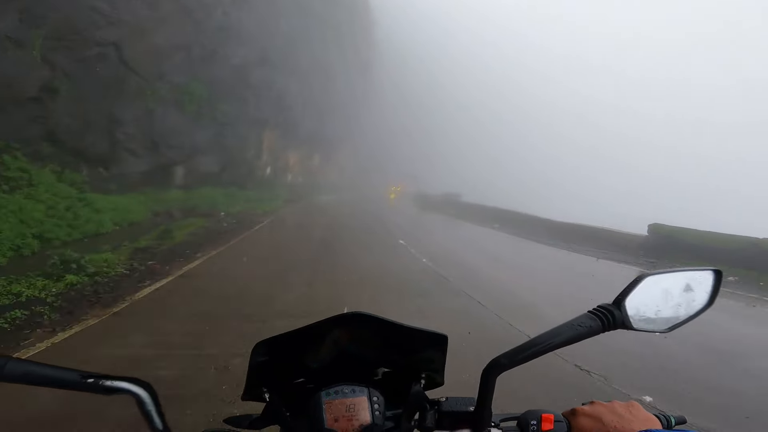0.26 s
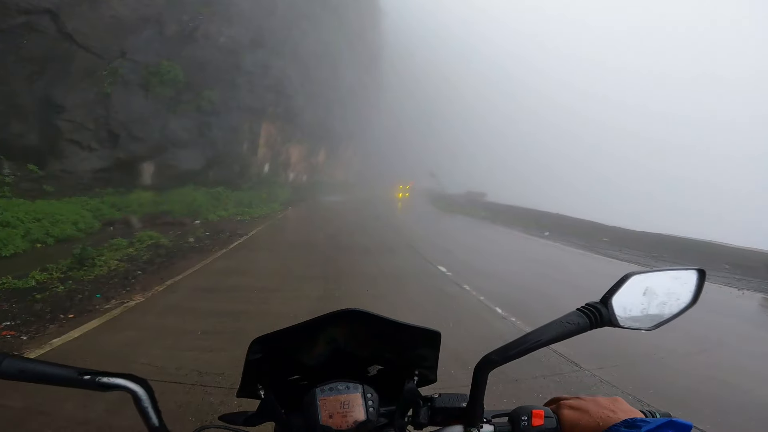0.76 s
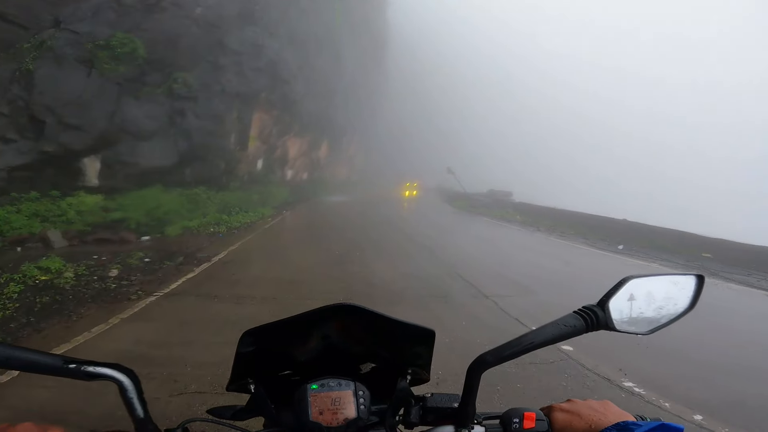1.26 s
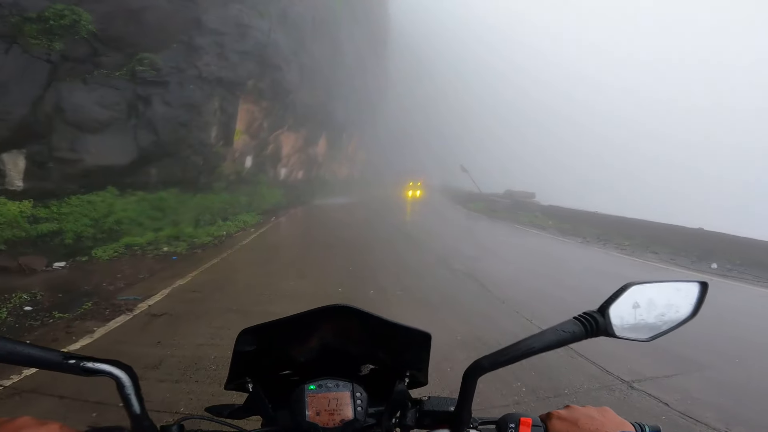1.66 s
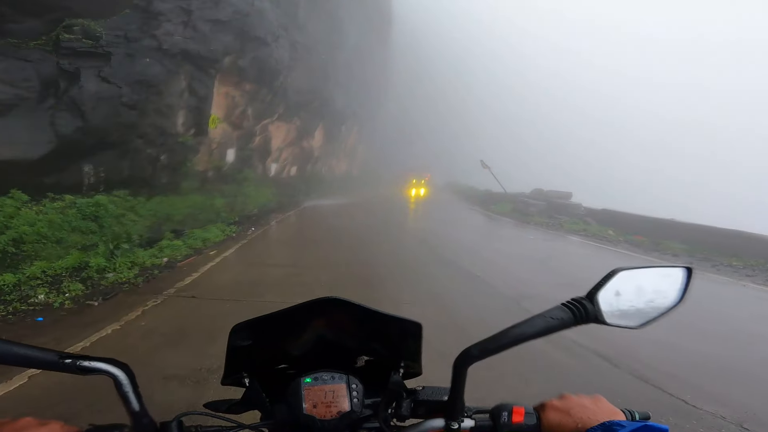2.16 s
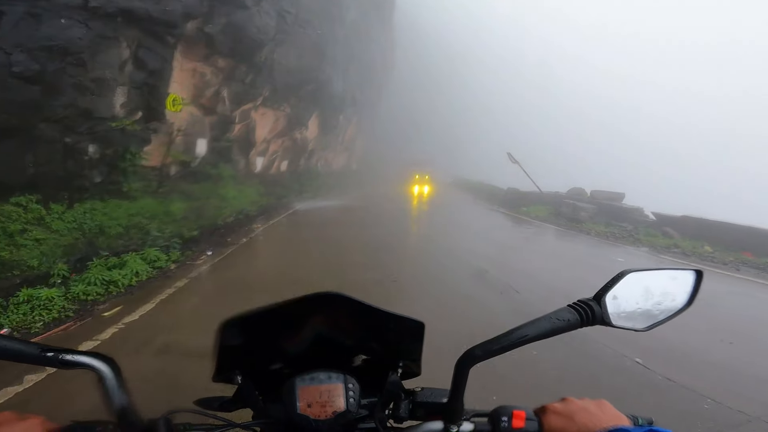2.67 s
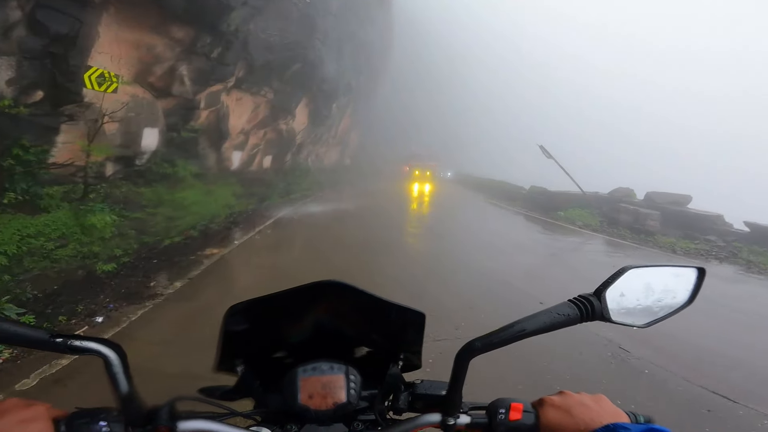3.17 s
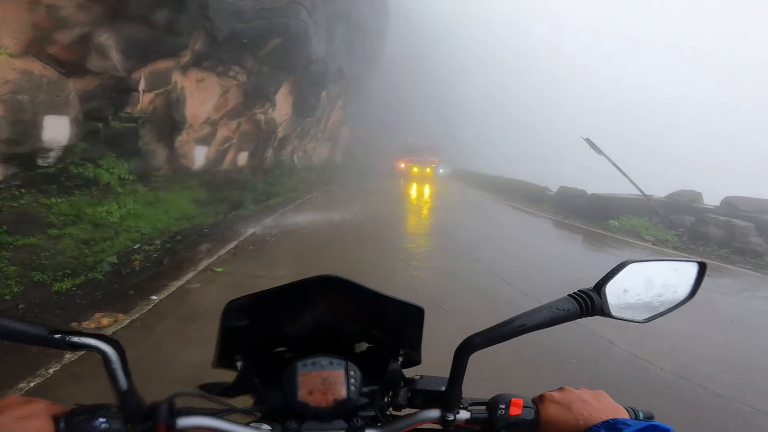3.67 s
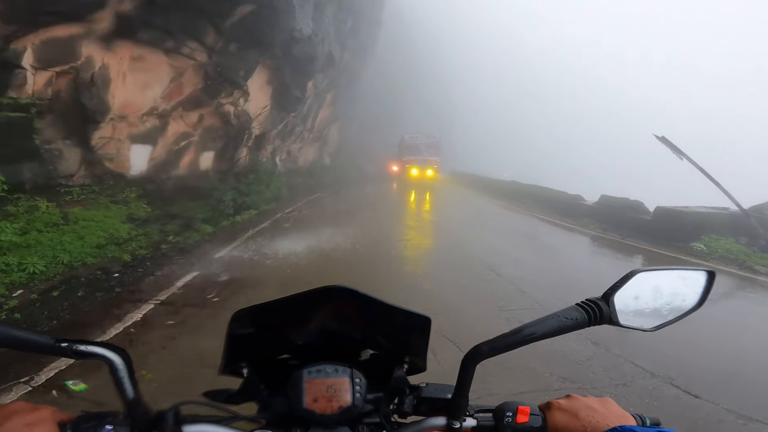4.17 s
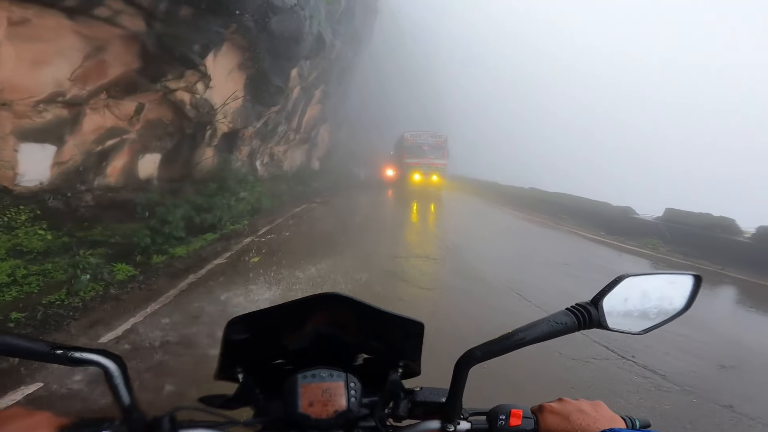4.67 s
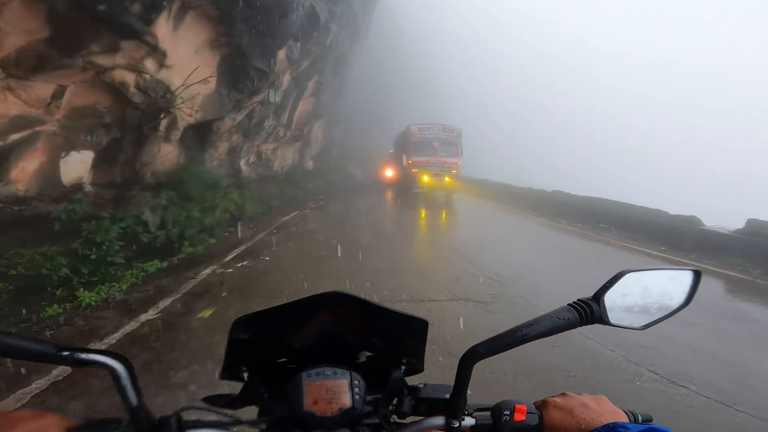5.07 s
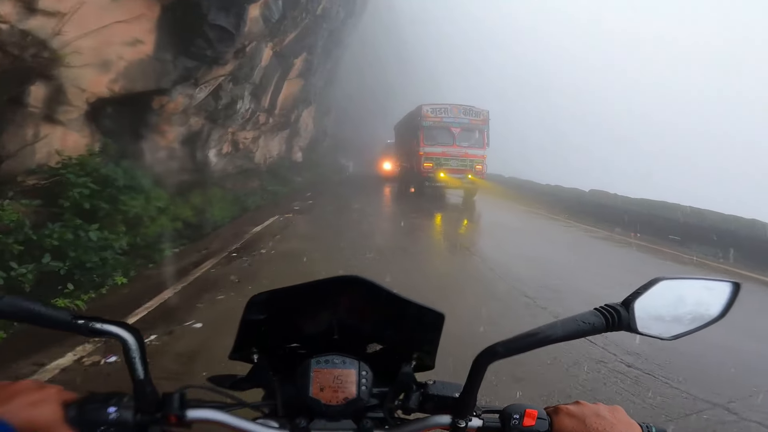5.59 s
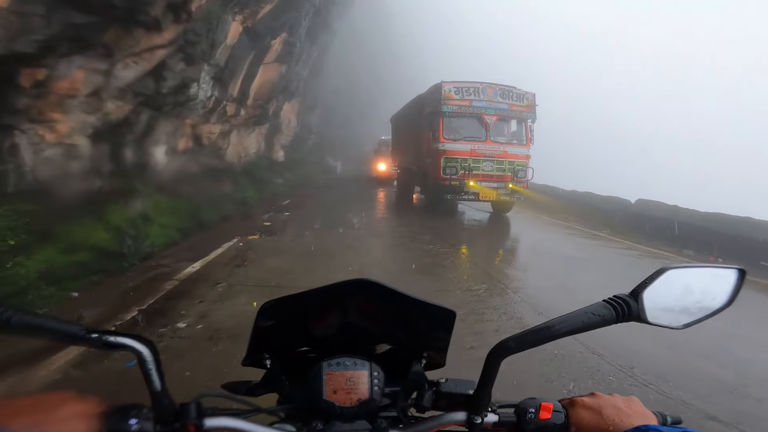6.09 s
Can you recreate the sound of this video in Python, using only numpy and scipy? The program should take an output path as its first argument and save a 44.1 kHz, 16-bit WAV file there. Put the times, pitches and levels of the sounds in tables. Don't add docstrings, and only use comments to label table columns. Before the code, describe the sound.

A stereo helmet microphone on a motorcycle ridden along a wet cliff road. From 0 to 6.3 seconds the single-cylinder engine dominates: an even, low throb at about sixteen firings a second, each with a hollow puff, slight metallic valve clack and breathy exhaust chuff. Below it wind presses and flutters unevenly, easing after 5 seconds. A very faint, thin high pump whine swells occasionally. Tyre roar and wet spray grow gradually, especially from 3 seconds, as a truck approaches. Soft single drops tick around 0.2, 0.5, 1.6 and 2.1. At about 3.85 and 4.02 a distant two-toned truck horn gives two short toots, with a barely audible third touch and cliff echo. A waterfall's hiss climbs on the left, peaking near 5.3. From 5.2, and thickest around 5.4 to 6, drops pelt the microphone housing with sharp taps and patter, thinning by the end under the strongest road roar.

```python
import sys
import numpy as np
from scipy import signal
from scipy.fft import rfft, irfft, next_fast_len
from scipy.io import wavfile
from scipy.ndimage import uniform_filter1d, map_coordinates

SR = 44100
rng = np.random.default_rng(int(sys.argv[2]) if len(sys.argv) > 2 else 0)


def volts_from_decibels(level):
    exponent = np.asarray(level, float) / 20
    return 10 ** exponent


def generate_wav(signal):
    frames = np.transpose(np.atleast_2d(signal))
    scaled = np.clip(frames, -1, 1) * 32767
    pcm = np.round(scaled).astype(np.int16)
    wavfile.write(sys.argv[1], SR, pcm)


N = 279594

# start in seconds, end in seconds, level in dB.
HORN_TOOTS = [
    (3.845, 4.0, -34),
    (4.02, 4.12, -35),
    (4.18, 4.24, -46),
]
# frequency in Hz, level in dB.
HORN_PARTIALS = [(489, -8), (979, 2), (1466, -6), (1957, -11), (2443, -25), (3912, -34), (830, -8),
                 (1245, -6)]
# centre in seconds, half length in seconds, level in dB.
PUMP_SWELLS = [
    (.44, .07, -66),
    (.67, .07, -68),
    (1.17, .22, -65.5),
    (1.93, .2, -65),
    (2.75, .15, -71),
    (3.35, .15, -70),
    (4.1, .25, -71),
]
# time in seconds, hiss level in dB.
FALL_HISS = [(0.0, -61.5), (0.5, -60), (0.9, -61.5), (1.7, -57.5), (2.1, -57), (2.8, -54.5), (3.2, -54.5),
             (3.5, -54), (4.0, -50.5), (4.6, -50), (4.85, -47.5), (5.3, -44.5), (5.7, -48), (6.1, -49),
             (6.34, -50.5)]
# frequency in Hz, density in dB per Hz.
SPLASH_SPECTRUM = [(1800, -120), (2800, 2), (3600, 3.5), (4400, -0.5), (5400, -0.5), (6200, -20.5),
                   (9000, -120)]
HISS_SPECTRUM = [(3500, -120), (5000, -17), (5700, 0.5), (7500, 4.5), (10000, 0.5), (11500, -2.5),
                 (12500, -28), (17000, -120)]
SIZZLE_SPECTRUM = [(6500, -120), (8500, -10), (10500, -14), (12000, -1), (14000, -3), (15500, -8),
                   (16200, -37), (18000, -120)]
# time in seconds, roar level in dB.
ROAD_ROAR = [(0.0, -24.5), (0.14, -27), (0.48, -24.5), (0.85, -28.5), (1.32, -25.5), (2.35, -24.5),
             (3.05, -23), (3.46, -24), (3.9, -21), (4.5, -21), (5.26, -19), (6.02, -19.5), (6.34, -16.5)]
# frequency in Hz, density in dB per Hz.
ROAR_SPECTRUM = [(33, -9), (56, 1), (128, -1.5), (182, -6), (231, -8), (258, -4.5), (301, -10.5), (388, -6),
                 (459, -7), (661, -10), (1600, -37), (2080, -70), (3520, -120)]
SPRAY_SPECTRUM = [(530, -20), (900, -0.5), (1200, -5), (1800, -13.5), (2300, -17.5), (3000, -22),
                  (3600, -35.5), (5000, -66), (7000, -120)]
# time in seconds, strength in dB.
WIND_STRENGTH = [(0, -11), (.25, -14.5), (.8, -17), (1, -17), (1.4, -12.5), (1.7, -12), (2.1, -16),
                 (2.6, -11), (3.25, -17), (3.7, -16), (4.25, -15.5), (4.6, -16.5), (4.95, -17),
                 (5.4, -23.5), (6.34, -29.5)]
# frequency in Hz, density in dB per Hz.
PUSH_SPECTRUM = [(1.2, -30), (2.5, -6), (8, 21.5), (17, -9.5), (22, -12.5), (40, -120)]
FLUTTER_SPECTRUM = [(8, -120), (16, -17), (20, -5.5), (30, 4.5), (38, 6), (46, -10.5), (56, -27.5),
                    (100, -120)]
# time in seconds, ring in dB, smack in dB, burst in dB.
BIG_DROPS = [(0.1625, -31, -70, -56), (0.5165, -29, -36, -37), (1.414, -37, -58, -62),
             (1.5945, -20, -44, -53), (2.0687, -24, -59, -64), (2.543, -39, -38, -43),
             (2.951, -32, -52, -45), (5.2335, -9, -20, -22), (5.306, -18, -51, -45),
             (5.3555, -19, -50, -34), (5.4042, -6, -31, -39), (5.4104, -11, -38, -34),
             (5.4194, -12, -35, -37), (5.4535, -20, -44, -40), (5.4838, -11, -31, -40),
             (5.504, -3, -14, -17), (5.5387, -28, -27, -26), (5.562, -19, -33, -39),
             (5.5888, -15, -26, -26), (5.6162, -29, -21, -18), (5.6335, -21, -30, -28),
             (5.6445, -13, -33, -34), (5.652, -9, -27, -24), (5.698, -15, -45, -53),
             (5.7412, -19, -35, -34), (5.782, -25, -27, -26), (5.836, -18, -36, -40),
             (5.9464, -13, -40, -40), (5.9705, -27, -32, -42), (6.0277, -31, -29, -27)]
# time in seconds, rate in drops per second, level in dB.
SMALL_DROPS = [(0, 0.5, -42), (5, 0, -42), (5.2, 90.5, -47), (5.55, 299.5, -31.5), (5.95, 259.5, -31.5),
               (6.34, 111, -45)]
# time in seconds, firings so far, charge in dB.
CRANKSHAFT = [(-0.0216, 0, 1.4), (0.3434, 6, -0.2), (0.581, 10, -1.8), (1.0676, 18, -2.2),
              (1.559, 26, -1.2), (1.7954, 30, 0.1), (2.0385, 34, -0.2), (2.1643, 36, 0.2),
              (2.5332, 42, -0.4), (3.1337, 52, 0), (4.2379, 70, 1.8), (4.3561, 72, 1.4), (4.4792, 74, 0.6),
              (4.7344, 78, 1.5), (4.9793, 82, 1.5), (5.2178, 86, -0.7), (5.831, 96, 0.5),
              (6.4542, 106, 0.4)]
# frequency in Hz, width in Hz, gain in dB.
PIPE_MODES = [(62.0, 14.1, 35.1), (120.0, 27.2, 23.1), (122.0, 14.0, 25.6), (256.6, 47.7, 24.5),
              (315.6, 19.7, 21.9)]
SILENCER_MODES = [(130.9, 98.3, 14.6), (207.7, 50.0, 12.3), (388.9, 33.9, 36.0), (336.3, 29.4, 19.9)]
COVER_MODES = [(578.5, 12, 7.5), (637, 100, 2.5), (623, 92, 8), (870, 16, 4.5)]
# frequency in Hz, density in dB per Hz.
CHUFF_SPECTRUM = [(250, -120), (450, -6.5), (600, -2), (900, -9.5), (1600, -31.5), (4000, -120)]
# frequency in Hz, likeness from 0 to 1.
PORT_LIKENESS = [(30, .93), (80, .91), (200, .97), (520, .98), (890, .86), (1520, .4), (2600, .15),
                 (8000, 0), (13000, .25)]
# frequency in Hz, lead of the left in radians.
PORT_LEAD = [(60, 0), (300, .2), (860, .55), (2000, .8), (8000, 0)]
# frequency in Hz, left over right in dB.
PORT_TILT = [(30, 2), (125, 0), (400, 0.5), (900, 1), (2200, 6), (4500, -3.5), (8000, 3), (13000, 6.5)]

PUMP_HZ, PUMP_REST_DB = 11312, -78.5
NEAR_DB = -49
SIZZLE_DB, SIZZLE_GROWS = -11.5, 0.34
SPLASH_DB, SPLASH_GROWS = -5, -0.31
BEHIND_S, SHADE_DB = 5.45, -5
SPIT_PER_S, SPIT_DB = 120, -5
ROAR_MID_DB, SPRAY_DB, SPRAY_GROWS = -24, -37.5, 1.4
PUDDLE_S, PUDDLE_WIDE_S, PUDDLE_DB = 5.6, .35, 5.5
PUSH_DB, LUMPS_DB = -15.5, 2
RING_HZ, RING_SPREAD_HZ, LEFT_DB = 1400, 400, 2
PUFF_S, TRAVEL_S = .000177, .00332
BOUNCE_S, BOUNCE = .00831, .61
CLACK_LATE_S = .00447
CHUFF_DB, CHUFF_LATE_S, CHUFF_RISE_S, CHUFF_T60_S = -35.5, .004, .0025, .05


def unit(x):
    return x / np.sqrt(np.mean(x ** 2) + 1e-20)


def along(points, hz):
    f, v = np.transpose(points)
    return np.interp(np.log(hz + 1), np.log(f + 1), v)


def curves(rows):
    s, *columns = np.transpose(rows)
    return [np.interp(np.arange(N) / SR, s, column) for column in columns]


def wobble(rate):
    knots = rng.standard_normal(int(N * 40 / SR) + 4)
    return map_coordinates(knots, [np.arange(N) * min(rate, 40) / SR])


def filtered(x, response):
    m = next_fast_len(N + SR // 2)
    return irfft(rfft(x, m) * response(np.fft.rfftfreq(m, 1 / SR)), m)[..., :N]


def modes(table, f):
    total = 0
    for k, (centre, width, db) in enumerate(table):
        total = total + (-1) ** k * volts_from_decibels(db) * 1j * f * width / (centre * centre - f * f + 1j * f * width)
    return total


def bounce(f):
    return 1 + BOUNCE * np.exp(-2j * np.pi * f * BOUNCE_S)


def ports(hz):
    half = volts_from_decibels(along(PORT_TILT, hz) / 2) * np.exp(.5j * along(PORT_LEAD, hz))
    return np.array([half, 1 / half])


def rush(spectrum, patchy_db):
    z = signal.stft(rng.standard_normal((2, N)), nperseg=512)[2]
    patches = rng.standard_normal(z.shape[1:])
    patches = uniform_filter1d(uniform_filter1d(patches, 6, 0), 10, 1)
    pair = signal.istft(z * volts_from_decibels(patchy_db * unit(patches)), nperseg=512)[1][:, :N]

    def mid_side(hz):
        turn = np.arccos(np.clip(along(PORT_LIKENESS, hz), -1, 1)) / 2
        return volts_from_decibels(along(spectrum, hz)) * [np.cos(turn), np.sin(turn)]

    mid, side = filtered(pair, mid_side)
    return np.array([mid + side, mid - side]) / np.std(mid)


def horn():
    t = np.arange(N) / SR
    gate = sum(volts_from_decibels(db) * np.clip(np.minimum(t - a, b - t) / .025, 0, 1) for a, b, db in HORN_TOOTS)
    tone = gate * sum(np.sqrt(2) * volts_from_decibels(db) * np.sin(2 * np.pi * hz * t) for hz, db in HORN_PARTIALS)
    tail = rng.standard_normal((2, SR // 3)) * volts_from_decibels(-60 * np.arange(SR // 3) / SR / .45)
    echo = signal.fftconvolve(tone[None], tail / np.linalg.norm(tail[0]), axes=1)[:, :N]
    return volts_from_decibels(1.5) * tone + volts_from_decibels(-7) * echo


def pump_whine():
    t = np.arange(N) / SR
    swells = sum(volts_from_decibels(db) * np.exp(-((t - s) / half) ** 2) for s, half, db in PUMP_SWELLS)
    level = (volts_from_decibels(PUMP_REST_DB) + swells) * volts_from_decibels(2.3 * wobble(30))
    pitch = PUMP_HZ + 7 * wobble(35)
    return np.sqrt(2) * level * np.sin(2 * np.pi * np.cumsum(pitch) / SR)


def waterfall():
    hiss_db, = curves(FALL_HISS)
    nearer_db = hiss_db - NEAR_DB
    behind = np.clip((np.arange(N) / SR - BEHIND_S) / .2, 0, 1)
    sizzle_db = SIZZLE_DB + SIZZLE_GROWS * nearer_db + SHADE_DB * behind
    splash_db = SPLASH_DB + SPLASH_GROWS * nearer_db
    splash = rush(SPLASH_SPECTRUM, patchy_db=.8)
    hiss = rush(HISS_SPECTRUM, patchy_db=.8)
    sizzle = rush(SIZZLE_SPECTRUM, patchy_db=.8)
    sheets_db = .6 * wobble(9) + .9 * wobble(22)
    chance = rng.random((2, N))
    hits = (chance[0] < SPIT_PER_S / SR) * -np.log(chance[1] + 1e-9)
    decay = volts_from_decibels(-60 * np.arange(512) / SR / .012)
    spit = 1 + volts_from_decibels(SPIT_DB) * signal.fftconvolve(hits, decay)[:N]
    water = volts_from_decibels(splash_db) * splash + spit * (hiss + volts_from_decibels(sizzle_db) * sizzle)
    return volts_from_decibels(hiss_db + 1.5 + sheets_db) * water


def road(beat):
    roar_db, = curves(ROAD_ROAR)
    puddle = np.exp(-((np.arange(N) / SR - PUDDLE_S) / PUDDLE_WIDE_S) ** 2)
    spray_db = SPRAY_DB + SPRAY_GROWS * (roar_db - ROAR_MID_DB) + PUDDLE_DB * puddle
    gust = wobble(6.8)
    roar_level = volts_from_decibels(roar_db + 3 + 0.39 * gust) * (1 + .5 * beat)
    spray_level = volts_from_decibels(spray_db + 0.83 + 0.18 * gust + 0.31 * wobble(27)) * (1 + 0.097 * beat)
    roar = roar_level * rush(ROAR_SPECTRUM, patchy_db=0.94)
    spray = spray_level * rush(SPRAY_SPECTRUM, patchy_db=-1.25)
    return roar + spray


def wind():
    strength_db, = curves(WIND_STRENGTH)
    push = volts_from_decibels(PUSH_DB + LUMPS_DB * wobble(4)) * rush(PUSH_SPECTRUM, patchy_db=.3)
    flutter = volts_from_decibels(strength_db - 3) * rush(FLUTTER_SPECTRUM, patchy_db=.3)
    return .5 * np.tanh(push / .5) + flutter


def small_drops():
    rate, level_db = curves(SMALL_DROPS)
    chance = rng.random((900, 6))
    at = np.searchsorted(np.cumsum(rate) / SR, np.cumsum(-np.log(chance[:, 0])))
    db = level_db[np.minimum(at, N - 1)]
    ring_db = db + 12 * chance[:, 1] ** 2
    hz = 900 + 1500 * chance[:, 2]
    smack_db = db - 22 + 14 * chance[:, 3]
    burst_db = db - 24 + 14 * chance[:, 4]
    pan_db = 6 * chance[:, 5] - 2.5
    return np.c_[at / SR, ring_db, hz, smack_db, burst_db, pan_db][at < N]


def big_drops():
    s, ring_db, smack_db, burst_db = np.transpose(BIG_DROPS)
    spot = rng.random((len(BIG_DROPS), 2))
    hz = RING_HZ + RING_SPREAD_HZ * spot[:, 0]
    pan_db = LEFT_DB + 3 * (spot[:, 1] - .5)
    return np.c_[s, ring_db, hz, smack_db, burst_db, pan_db]


def drops_on_housing():
    t = np.arange(1024) / SR

    def swell(rise_s, t60_s):
        return (1 - np.exp(-(t / rise_s) ** 2)) * volts_from_decibels(-60 * t / t60_s)

    smack = signal.butter(2, [3200, 5600], "band", fs=SR, output="sos")
    burst = signal.butter(2, [6500, 14000], "band", fs=SR, output="sos")
    spatter = signal.butter(4, [700, 2900], "band", fs=SR, output="sos")
    out = np.zeros((2, N + len(t)))
    for s, ring_db, hz, smack_db, burst_db, pan_db in [*big_drops(), *small_drops()]:
        pitch = hz * (.8 + .4 * np.exp(-t / .002))
        jitter = np.cumsum(rng.normal(0, .06, len(t)))
        ring = np.sin(2 * np.pi * np.cumsum(pitch) / SR + jitter)
        body = np.sin(2 * np.pi * 620 * t)
        noise = rng.standard_normal((3, 2, len(t)))
        x = volts_from_decibels(ring_db + 4) * swell(.0004, .016) * ring
        x = x + volts_from_decibels(ring_db + 3) * swell(.0008, .016) * body
        x = x + volts_from_decibels(ring_db + 5) * swell(.0004, .018) * signal.sosfilt(spatter, noise[2])
        x = x + volts_from_decibels(smack_db + 12) * swell(.0003, .015) * signal.sosfilt(smack, noise[0])
        x = x + volts_from_decibels(burst_db + 5) * swell(.0003, .011) * signal.sosfilt(burst, noise[1])
        out[:, round(s * SR):][:, :len(t)] += x * volts_from_decibels(pan_db * np.array([[.5], [-.5]]))
    return out[:, :N]


def firings():
    s, turns, charge_db = np.transpose(CRANKSHAFT)
    k = np.arange(turns[-1])
    chance = rng.standard_normal((len(k), 3))
    arrival_s = np.interp(k, turns, s) + TRAVEL_S + 0.00035 * chance[:, 0]
    at = np.round(arrival_s * SR).astype(int)
    size = volts_from_decibels(np.interp(k, turns, charge_db) + 0.16 * chance[:, 1])
    tap_size = size * volts_from_decibels(1.5 * chance[:, 2])
    inside = (at >= 0) & (at < N)
    puffs = np.bincount(at[inside], size[inside], N)
    taps = np.bincount(at[inside], tap_size[inside], N)
    return puffs, taps


def gas_flow(puffs):
    t = np.arange(SR // 10) / SR
    return signal.fftconvolve(puffs, t / 0.054 * np.exp(1 - t / 0.009))[:N]


def exhaust_note(puffs):
    def response(f):
        soft = 1 / (1 + 2j * np.pi * f * PUFF_S) ** 2
        low_cut = 1 + (48 / (f + 1)) ** 16
        return -modes(PIPE_MODES, f) * modes(SILENCER_MODES, f) * soft / low_cut * bounce(f)

    return volts_from_decibels(0.12) * filtered(puffs, response)


def valve_clack(taps):
    def response(f):
        late = np.exp(-2j * np.pi * f * CLACK_LATE_S)
        return modes(COVER_MODES, f) / (1 + (f / 5000) ** 4) * bounce(f) * late

    return volts_from_decibels(8.0) * filtered(taps, response)


def tailpipe_chuff(taps):
    since = np.maximum(np.arange(SR // 10) / SR - CHUFF_LATE_S, 0)
    swell = (1 - np.exp(-(since / CHUFF_RISE_S) ** 2)) * volts_from_decibels(-60 * since / CHUFF_T60_S)
    gate = signal.fftconvolve(taps, swell)[:N]
    return volts_from_decibels(CHUFF_DB) * unit(gate) * rush(CHUFF_SPECTRUM, patchy_db=2)


def scene():
    puffs, taps = firings()
    background = horn() + pump_whine() + waterfall() + road(gas_flow(puffs)) + wind()
    engine = exhaust_note(puffs) + valve_clack(taps) + tailpipe_chuff(taps)
    return filtered(background + engine, ports) + drops_on_housing()


def low_pass(x):
    return signal.sosfilt(signal.butter(12, 15800, fs=SR, output="sos"), x)


def record(dry):
    limited = dry / (1 + np.abs(dry / .99) ** 12) ** (1 / 12)
    return low_pass(limited)


dry = scene()
out = record(dry)
generate_wav(out)
```